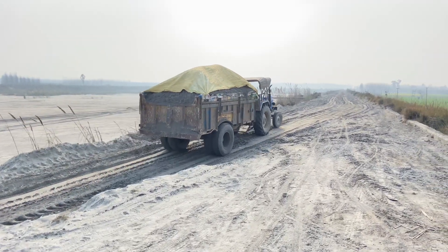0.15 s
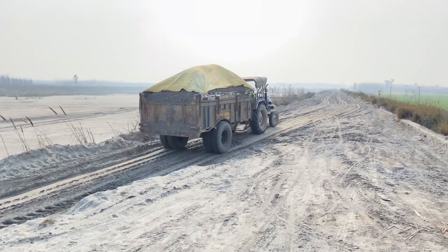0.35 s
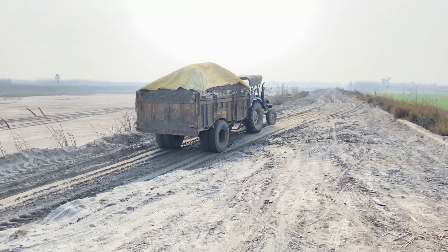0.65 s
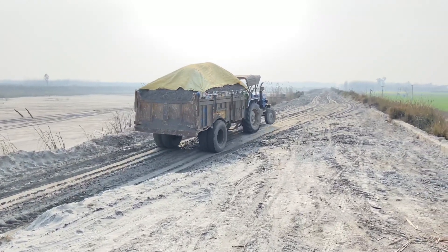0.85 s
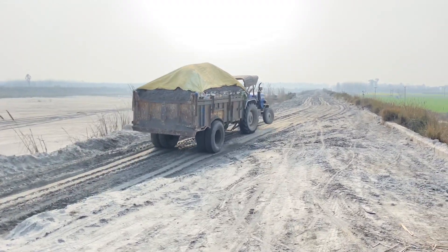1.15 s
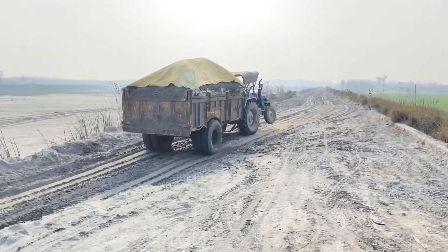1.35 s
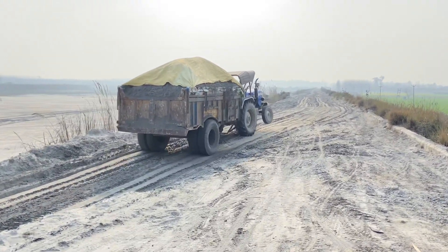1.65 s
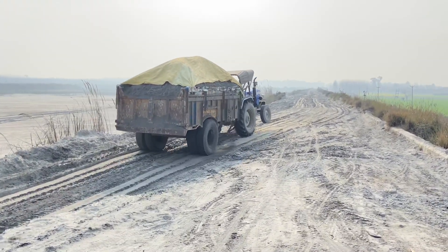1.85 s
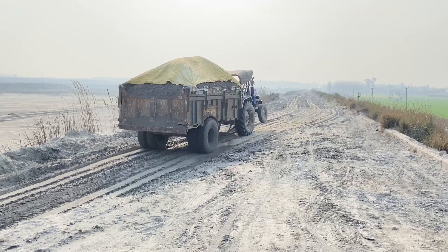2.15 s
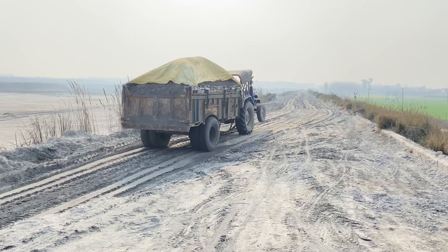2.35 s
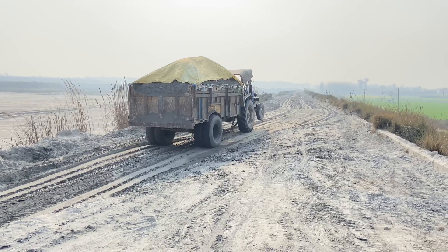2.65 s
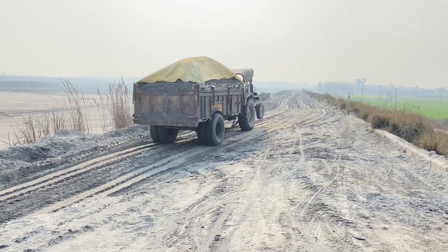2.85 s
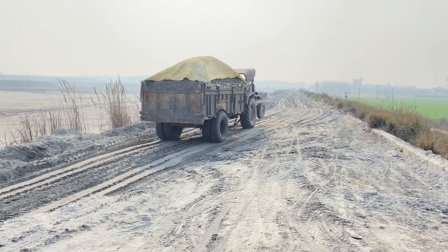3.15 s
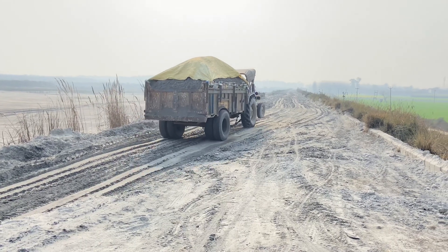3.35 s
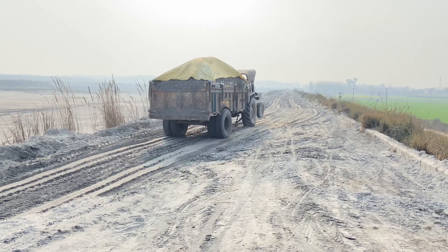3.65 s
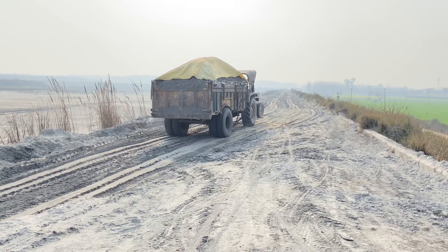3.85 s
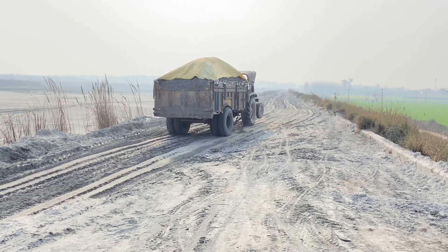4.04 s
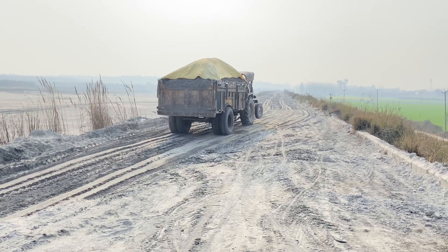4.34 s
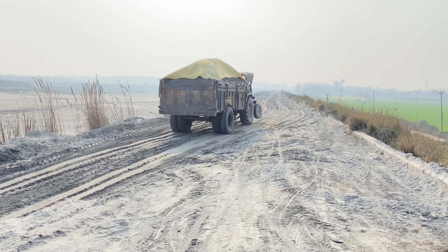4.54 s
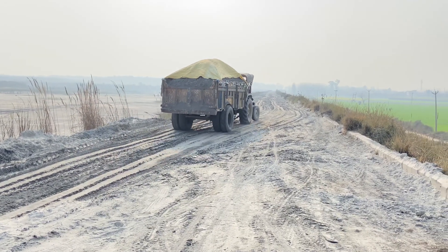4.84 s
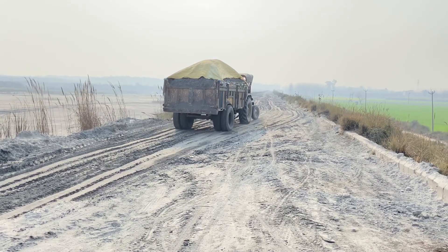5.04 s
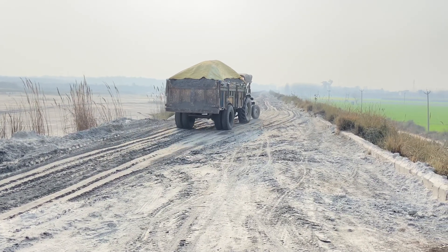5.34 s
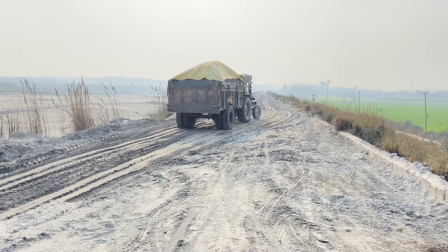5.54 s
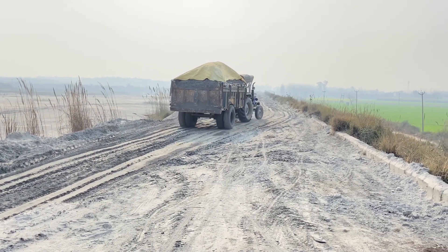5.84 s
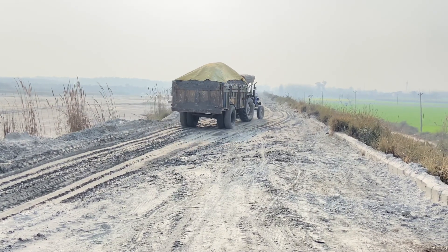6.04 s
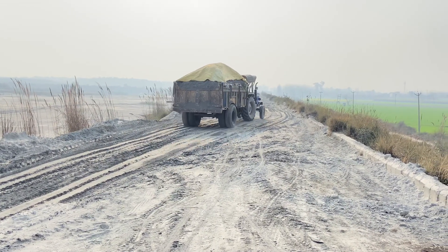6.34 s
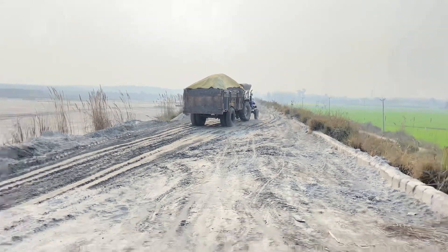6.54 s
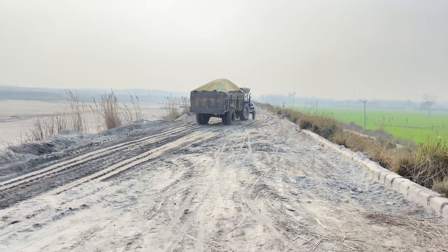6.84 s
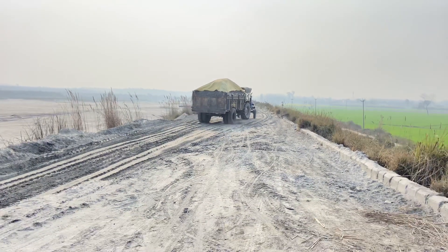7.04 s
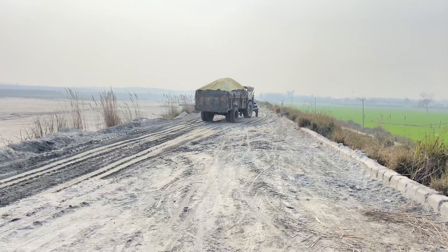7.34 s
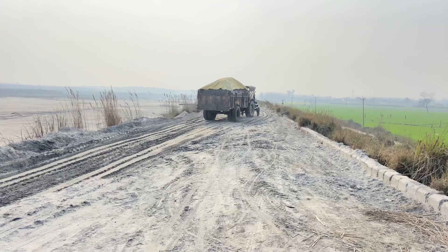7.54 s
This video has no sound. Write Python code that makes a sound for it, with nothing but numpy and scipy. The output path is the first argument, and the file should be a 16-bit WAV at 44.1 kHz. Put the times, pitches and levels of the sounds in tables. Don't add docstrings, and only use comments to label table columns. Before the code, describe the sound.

A diesel tractor throbs steadily hauling a loaded trailer away, eases off, then pulls again with hitch clacks, while wind thumps the microphone.

```python
import sys
import numpy as np
from scipy import signal
from scipy.fft import rfft, irfft, next_fast_len
from scipy.io import wavfile
from scipy.ndimage import uniform_filter1d

SR = 44100
rng = np.random.default_rng(int(sys.argv[2]) if len(sys.argv) > 2 else 0)


def materialize(psi):
    bounded = np.clip(np.atleast_2d(psi).T, -1, 1)
    quanta = np.round(bounded * 32767).astype(np.int16)
    wavfile.write(sys.argv[1], SR, quanta)


def decibels_to_gain(level_db):
    exponent = np.asarray(level_db, float) / 20
    return 10 ** exponent


N = 339084
T = np.arange(N) / SR
F = np.fft.rfftfreq(next_fast_len(N), 1 / SR)

# (time [s], firing rate [Hz], level at the phone [dB], throttle [dB], strain [0-1])
ENGINE = [(0.0, 57.3, -30, -3, 0.4), (0.2, 56.55, -31, -1, 0.37), (0.6, 54.01, -31, 0, 0.47),
          (1.1, 53.34, -29.5, -1, .6), (1.9, 53.63, -30.5, 0.5, 0.55), (3.55, 54.45, -31, 0, 0.47),
          (4.0, 56.22, -31.5, 0.5, .5), (4.38, 56.02, -32.5, 0.5, 0.36), (4.52, 54.48, -34, 0.5, .3),
          (5.15, 53.71, -34.5, 0, 0.12), (5.28, 52.33, -36.5, -5.5, 0.15), (5.76, 45.6, -38, -7, 0.28),
          (6.1, 46, -38, 0, 0.25), (6.3, 43.11, -37, -2, 0.09), (6.6, 44.72, -38, 0, 0.28),
          (6.85, 44.76, -38, 1, 0.59), (7.1, 46.26, -37.5, 0, 0.52), (7.69, 46.9, -39, -0.5, 0)]
# (time [s], added strain [0-1], length [s])
RUTS = [(0.15, 0.12, .05), (0.607, 0.22, 0.042), (1.015, 0.17, 0.054), (2.65, 0.057, 0.18),
        (3.041, 0.16, 0.13), (3.636, 0.18, 0.056), (3.924, 0.028, 0.07), (4.39, .1, 0.043),
        (4.97, 0.24, .06), (6.4, 0.17, 0.11), (6.555, .4, 0.17), (6.978, 0.14, .1), (7.304, -0.22, 0.21)]
# (time [s], time [s])
TURN_S = (5.93, 5.96)

# (time of peak [s], peak level [dB], length [s])
GUSTS = [(0.0, -21, 0.11), (1.567, -50, 0.026), (1.781, -42, 0.074), (2.61, -40, 0.022),
         (2.742, -26, 0.017), (2.9, -28, 0.012), (3.054, -28.5, 0.2), (3.677, -23, 0.029),
         (3.957, -21, 0.11), (4.096, -22.5, 0.077), (4.43, -23.5, 0.057), (4.9, -35, 0.157),
         (5.07, -34, .07), (5.4, -27, 0.13), (5.61, -33, .03), (5.732, -33, 0.063), (5.883, -30, 0.11),
         (6.168, -25, 0.086), (6.514, -24, 0.12), (6.72, -34, 0.028), (6.896, -29, 0.028),
         (7.548, -35, 0.078), (7.69, -29, .04)]
# (frequency [Hz], density [dB per Hz])
WIND = [(25, -31.5), (45, -3), (75, 3.5), (110, -8.5), (170, -7.5), (350, -32)]
# (time [s], ...)
PUFF_S = (3.69, 4.44, 6.178)
# (peak level [dB], frequency [Hz])
PUFFS = [(-15, 63), (-9, 84), (-6.5, 117.6)]
BREEZE_DB, GUST_RISE = -39, 0.97

# (before turn [dB], after turn [dB], throttle share [dB per dB])
HARMONICS = [(9.5, 1, 0.7), (10.5, 13, 2.07), (-7, 8, .5)]
# (order [per cycle], level [dB])
EARLY_ORDERS = [(1, -42), (2, -30), (3, -2), (4, -21), (5, -25), (6, 0), (7, -15.5), (8, -20), (9, -15),
                (10, -16), (11, -19), (12, -20.5), (13, -27.5), (14, -27.5), (15, -29.5), (16, -25.5),
                (17, -16.5), (18, -46.5), (19, -30), (20, -50), (21, -27.5), (22, -46), (23, -58),
                (24, -29)]
# (order [per cycle], level [dB])
LATE_ORDERS = [(1, -53.5), (2, -33.5), (3, -12), (4, -19.5), (5, -17), (6, 0), (7, -22), (8, -16), (9, -4),
               (10, -22.5), (11, -16), (12, -21), (13, -16), (14, -44), (15, -13.5), (16, -22), (17, -16.5),
               (18, -27.5), (19, -41), (20, -25.5), (21, -36), (22, -22), (23, -32), (24, -29.5)]
WEAK_PER_THROTTLE = 0.36

# (frequency [Hz], density [dB per Hz])
ROAR = [(24, -53), (40, -6), (114, -10.5), (131, -0.5), (162, -20.5), (210, -7), (255, -14.5), (309, -11.5),
        (495, -18), (821, -22), (995, -20.5), (1140, -26.5), (1830, -27.5), (2070, -25), (2600, -30.5),
        (3380, -40.5), (5720, -120)]
# (frequency [Hz], width [Hz], level [dB])
BONNET = [(806, 224, -6.5), (1142, 300, -8), (383, 37, -3.5)]
# (frequency [Hz], density [dB per Hz])
KNOCK = [(1200, -30), (1850, -0.5), (2100, -46), (2600, -5), (3300, -4), (4500, -6.5), (5600, -9.5),
         (7000, -10), (8000, -15), (9000, -14), (11000, -19.5), (13000, -20.5), (15700, -29)]
# (frequency [Hz], width [Hz], level before turn [dB], level after turn [dB])
PANELS = [(4142, 340, 6, 1), (3804, 350, 0.5, 7.5), (4976, 420, 0.5, -3), (2946, 170, -3, -21),
          (2500, 390, -37, 5.5), (1740, 580, -19, -22), (1360, 210, 0, 6.5)]
# (time [s], level against the knock [dB])
FACING = [(0, -3), (.5, -6), (1.2, -3), (1.9, -15.5), (2.5, -8.5), (3.4, -14.5), (3.8, -6.5), (4.5, -6),
          (6.2, -9.5), (6.36, -3), (7.69, -7.5)]
# (first level [dB], last level [dB])
AIR_DB = (5, -1)
KNOCK_DB, KNOCK_DB_PER_STRAIN, DEPTH_PER_STRAIN = -19, 14.5, 0.97

TEETH = 44
# (time [s], level [dB])
MESH = [(0, -50.5), (.5, -42.5), (1.8, -41.5), (2.2, -61), (4.4, -55), (5.0, -73), (5.65, -59),
        (5.85, -48.5), (7.69, -52)]
# (distance below it [multiples of the firing rate], start time [s], level against
# it [dB])
SIDEBANDS = [(1, 5.75, -3), (2, 6.1, 1.5), (4.33, 6.1, -4)]
HIGH_ORDERS, HIGH_DB, HIGH_SPREAD_DB = (31, 32, 34, 38, 41, 42), -24, 2

# (time [s], length [s], top pitch [Hz], level [dB])
BARKS = [
    (3.08, .11, 540, -39),
    (3.79, .11, 540, -39),
    (4.51, .11, 540, -38),
    (5.18, .12, 540, -37),
    (5.88, .11, 540, -38),
    (6.52, .12, 545, -35),
    (7.17, .11, 550, -36),
]
# (frequency [Hz], width [Hz], level [dB])
MUZZLE = [(530, 130, 0), (1090, 220, -1), (1640, 260, -3)]

# (time [s], level [dB], length [s])
BUMPS = [
    (4.5, -44, 0.2),
    (4.75, -41, -0.4),
    (4.97, -32, -0.04),
    (5.3, -38.5, 0.08),
    (5.57, -40.5, 0.2),
]
# (frequency [Hz], width [Hz], level [dB])
BED = [(201.7, 100, 3), (413, 180, 7.5), (720, 400, -4.5)]

# (time [s], length [s], start frequency [Hz], end frequency [Hz], level [dB])
CHIRP = (5.35, .045, 7250, 7000, -52)
# (start time [s], frequency [Hz], level [dB])
HUM = (5.55, 400, -57)
# (time [s], peak level [dB], frequency [Hz])
CLACKS = [(6.288, -26, 2740), (6.423, -26, 2390), (6.8172, -36, 3897), (6.8844, -27, 4100),
          (6.9075, -22, 4000), (6.9492, -35, 4040), (6.9748, -25, 4070), (7.0184, -36, 3918),
          (7.0394, -32, 4000), (7.1077, -32, 2480), (7.2847, -32, 3607)]

# (frequency [Hz], lead [half turns])
LEAD = [(1, 0), (1640, .06), (2000, .2), (2840, -.15), (3400, 0), (7500, 0), (8650, -1), (9350, -1),
        (10450, -2), (11750, -2), (12550, -3), (13800, -3), (14600, -4)]
# (frequency [Hz], difference [dB])
LEAN = [(60, -0.1), (300, 0), (700, 1.7), (1300, 3.5), (2400, 5.5), (3200, 0.5)]
# (frequency [Hz], level [dB])
SCATTER = [(110, -29), (300, -17), (900, -12), (2400, -8), (3400, -10), (3700, -65)]
# (frequency [Hz], level [dB])
SPREAD = [(3700, -60), (3900, -6), (5000, -8), (6400, -9), (6700, -22), (7000, -8), (7600, -8), (8000, -60)]
# (time [s], share [0-1])
ASKEW = [(0, 1), (1.0, .9), (1.55, .5), (1.62, 0), (6.5, 0), (6.6, 1), (7.69, .9)]
# (frequency [Hz], width [Hz], share [0-1])
DIPS = [(510, 50, .35), (985, 55, .5), (2070, 120, .55), (2600, 150, .3)]
# (frequency [Hz], width [Hz], level [dB])
FILL = (9220, 195, 2)


def curve(table):
    s, *columns = np.transpose(table)
    return [np.interp(T, s, column) for column in columns]


def shape(table):
    hz, value = np.transpose(table)
    return np.interp(np.log(F + 1), np.log(hz + 1), value)


def unit(x):
    return x / np.sqrt(np.mean(x ** 2))


def colour(x, gain):
    size = next_fast_len(N)
    return irfft(rfft(x, size) * gain, size)[..., :N]


def noise(table):
    in_band = (F > table[0][0]) * (F < table[-1][0])
    return unit(colour(rng.standard_normal(N), decibels_to_gain(shape(table)) * in_band))


def ring(x, modes):
    out = 0
    for hz, width, db in modes:
        out = out + decibels_to_gain(db) * signal.lfilter(*signal.iirpeak(hz, hz / width, SR), x)
    return out


def walk(rate):
    hold = int(SR / rate / 8)
    steps = np.repeat(rng.standard_normal(N // 8 // hold + 2), hold)
    coarse = uniform_filter1d(uniform_filter1d(steps, hold), hold)
    return 1.19 * np.repeat(coarse, 8)[:N]


def swell(s, length, rise=1):
    return np.exp(-((T - s) / (length * np.where(T < s, rise, 1))) ** 2)


def tone(order, cycles, db, start, waver):
    turns = order * cycles + start + waver * order * walk(9)
    return -decibels_to_gain(db) * np.sqrt(2) * np.cos(2 * np.pi * turns)


def wind():
    shared, own = noise(WIND), noise(WIND)
    gust = decibels_to_gain(BREEZE_DB) + sum(decibels_to_gain(db) * swell(s, length, GUST_RISE) for s, db, length in GUSTS)
    gust = gust * decibels_to_gain(1.34 * walk(16))
    puffs = np.zeros(N)
    for s, (db, hz) in zip(PUFF_S, PUFFS):
        puffs += decibels_to_gain(db) * swell(s, 0.008) * np.sin(2 * np.pi * hz * (T - s))
    return gust * (shared + 0.23 * own * np.array([[1], [-1]])) + puffs * np.array([[1.1], [.9]])


def exhaust(cycles, firing_db, weak_db, turn):
    out = np.zeros(N)
    starts = (-.13, 0, 0)
    for k, db in enumerate(firing_db):
        out += tone(3 * (k + 1), cycles, db + .8 * walk(11), starts[k], waver=.004)
    coasting_db = -12 * turn * (1 - turn)
    for (order, early_db), (_, late_db) in zip(EARLY_ORDERS, LATE_ORDERS):
        if order in (3, 6, 9):
            continue
        db = (1 - turn) * (early_db + 10.5) + turn * (late_db + 11.0)
        db = weak_db + db + coasting_db + 1.6 * walk(5)
        out += tone(round(order), cycles, db, rng.random(), waver=.004)
    return out


def block(cycles, turn, roar_db, knock_db, panel_db, depth):
    turns = 3 * cycles
    firing = (turns + 1.1).astype(int)
    phase = (turns + 0.872) % 1
    chance = rng.standard_normal((firing[-1] + 1, len(PANELS) + 1))[firing].T
    pulse = (1 - np.exp(-phase / 0.14)) * np.exp(-phase / 0.302)
    depth = np.clip(depth, 0, 1)

    hiss = noise(KNOCK)
    treble = colour(hiss, F > 8000)
    askew = curve(ASKEW)[0]
    patchy = np.zeros(N)
    for hz in (14150, 14850, 15550):
        share = np.clip(.5 + 1.5 * askew + 3 * walk(35), 0, 1)
        patchy += colour(hiss, abs(F - hz) < 350) * share
    air = decibels_to_gain(np.interp(T, (0, T[-1]), AIR_DB))
    hiss += treble * (air - 1) - patchy * air
    knock = hiss * (1 + depth * (unit(pulse * decibels_to_gain(2.43 * chance[0])) - 1))

    panels = np.zeros(N)
    for (hz, width, early_db, late_db), size in zip(PANELS, chance[1:]):
        blows = rng.standard_normal(N) * (1 - depth + depth * unit(pulse ** 2 * decibels_to_gain(2.8 * size)))
        mode = [(hz, width, 0)]
        panels += decibels_to_gain(early_db + turn * (late_db - early_db)) * unit(ring(ring(blows, mode), mode))

    sheet = unit(ring(ring(rng.standard_normal(N), BONNET), BONNET))
    throb = 1 + 0.27 * (unit(pulse) - 1)
    roar = (noise(ROAR) + decibels_to_gain(-12.0) * sheet) * throb * decibels_to_gain(.5 * walk(9.7))
    out = decibels_to_gain(roar_db + 3.0) * roar + decibels_to_gain(knock_db + 4.0) * knock
    return out + decibels_to_gain(knock_db + panel_db - 2.0) * panels


def gears(cycles, weak_db):
    mesh_db = curve(MESH)[0]
    wander = .12 * walk(10)

    def whine(teeth, db):
        return decibels_to_gain(db + 1.2 * walk(5)) * np.sqrt(2) * np.sin(2 * np.pi * (teeth * cycles + wander))

    out = whine(TEETH, mesh_db)
    for below, s, db in SIDEBANDS:
        out += np.clip((T - s) / .1, 0, 1) * whine(round(TEETH - 3 * below), mesh_db + db)
    for order in HIGH_ORDERS:
        size, start = rng.standard_normal(2)
        db = weak_db + HIGH_DB + HIGH_SPREAD_DB * size + 3 * walk(3)
        out += tone(order, cycles, db, start, waver=.003)
    return out


def dog():
    out = np.zeros(N)
    far = signal.butter(4, 2100, fs=SR, output="sos")
    for s, length, hz, db in BARKS:
        u = np.arange(int(length * SR)) / (length * SR)
        pitch = hz * (1 - 0.242 * np.clip(1 - u / 0.4973, 0, 1) ** 2)
        pulses = np.diff(np.floor(np.cumsum(pitch / SR)), prepend=0)
        breath = 1.5 * rng.standard_normal(len(u))
        voice = ring(ring(unit(pulses) + breath, MUZZLE), MUZZLE)
        voice = signal.sosfilt(far, voice)
        first = int(s * SR)
        out[first:first + len(u)] = decibels_to_gain(db) * unit(voice) * np.sin(np.pi * u ** 0.83)
    return np.array([-.6 * out, out])


def trailer():
    boom = unit(ring(ring(rng.standard_normal(N), BED), BED))
    return boom * sum(decibels_to_gain(db) * swell(s, length) for s, db, length in BUMPS)


def bird():
    s, length, start_hz, end_hz, db = CHIRP
    u = np.clip((T - s) / length, 0, 1)
    turns = np.cumsum(start_hz + u * (end_hz - start_hz)) / SR
    return decibels_to_gain(db) * np.sin(np.pi * u) * np.sin(2 * np.pi * turns)


def pump():
    s, hz, db = HUM
    fade = np.clip((T - s) / .2, 0, 1)
    return fade * decibels_to_gain(db + walk(4)) * np.sin(2 * np.pi * hz * T) * np.array([[1], [-1]])


def hitch():
    out, t = np.zeros(N), np.arange(900) / SR
    for s, db, hz in CLACKS:
        blow = rng.standard_normal(900) * np.exp(-t / 0.0072)
        steel = [(hz, 800, 0)]
        clack = ring(ring(blow, steel), steel)
        first = int(s * SR)
        out[first:first + len(t)] = decibels_to_gain(db - 2.0) * clack / np.abs(clack).max()
    return out


def ports(x):
    x = x * np.clip(np.minimum(T, T[-1] - T) / .003, 0, 1)
    askew = curve(ASKEW)[0]
    half = decibels_to_gain(shape(LEAN) / 2) * np.exp(.5j * np.pi * shape(LEAD))
    ground = np.prod([1 - share * np.exp(-((F - hz) / width) ** 2) for hz, width, share in DIPS], axis=0)
    direct = colour(x, ground * np.array([half, 1 / half]))

    tail = rng.standard_normal(6000) * np.exp(-np.arange(6000) / 860.0)
    echo = rfft(tail / np.sqrt(np.sum(tail ** 2)), next_fast_len(N))
    side = colour(x, echo * decibels_to_gain(shape(SCATTER))) + askew * colour(x, echo * decibels_to_gain(shape(SPREAD)))

    hz, width, db = FILL
    fill = colour(x, decibels_to_gain(db) * np.exp(-((F - hz) / width) ** 2))
    fill = np.clip(20 * askew - 18.2, 0, 1) * fill
    return fill + direct + side * np.array([[1], [-1]])


def scene():
    firing_hz, engine_db, throttle_db, strain = curve(ENGINE)
    strain = strain + sum(more * swell(s, length) for s, more, length in RUTS)
    cycles = np.cumsum(firing_hz / 3) / SR + .1 / 3
    turn = np.interp(T, TURN_S, (0, 1))
    firing_db = [engine_db + early + turn * (late - early) + share * throttle_db
                 for early, late, share in HARMONICS]
    weak_db = engine_db + WEAK_PER_THROTTLE * throttle_db
    knock_db = engine_db + KNOCK_DB + KNOCK_DB_PER_STRAIN * strain
    tractor = exhaust(cycles, firing_db, weak_db, turn)
    tractor += block(cycles, turn, engine_db, knock_db, curve(FACING)[0], DEPTH_PER_STRAIN * strain)
    tractor += gears(cycles, weak_db)
    return ports(tractor + trailer() + bird() + hitch()) + wind() + dog() + pump()


def low_pass(x):
    return signal.sosfilt(signal.butter(12, 16600, fs=SR, output="sos"), x)


def record(dry):
    low_cut = signal.butter(2, 35, "high", fs=SR, output="sos")
    mix = signal.sosfilt(low_cut, dry)
    return low_pass(mix)


dry = scene()
out = record(dry)
materialize(out)
```